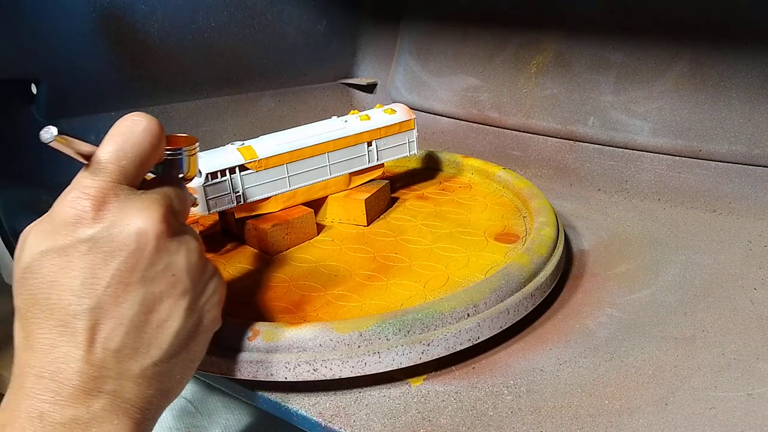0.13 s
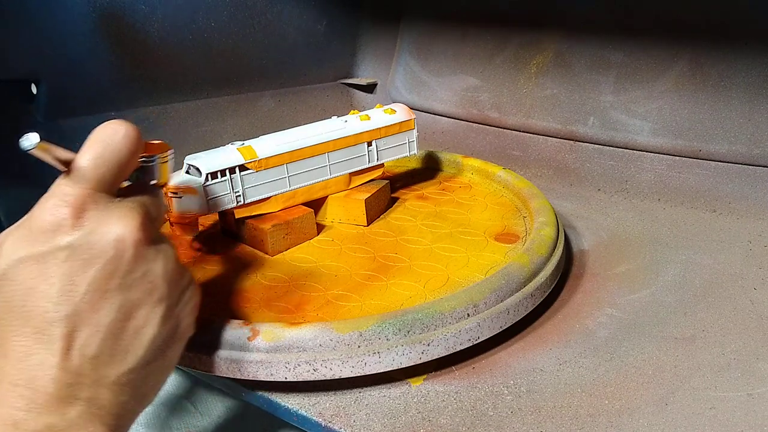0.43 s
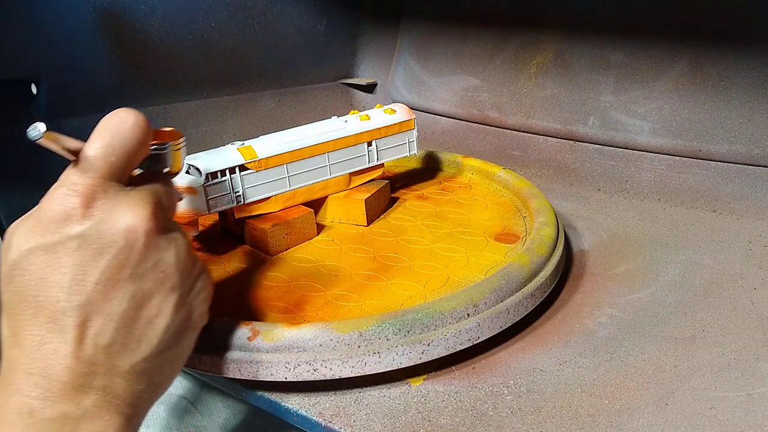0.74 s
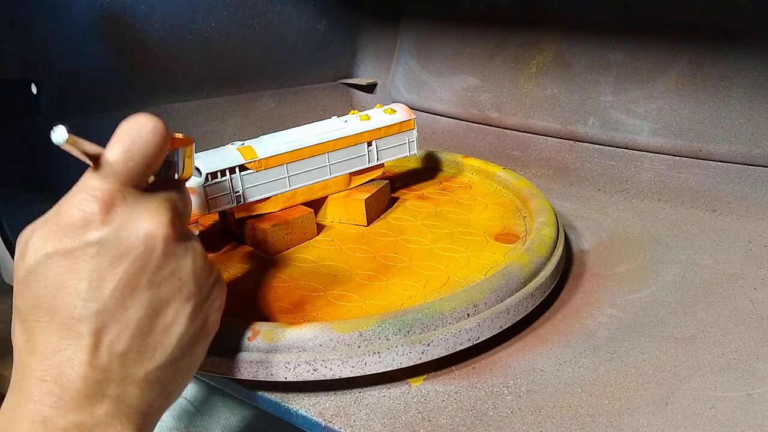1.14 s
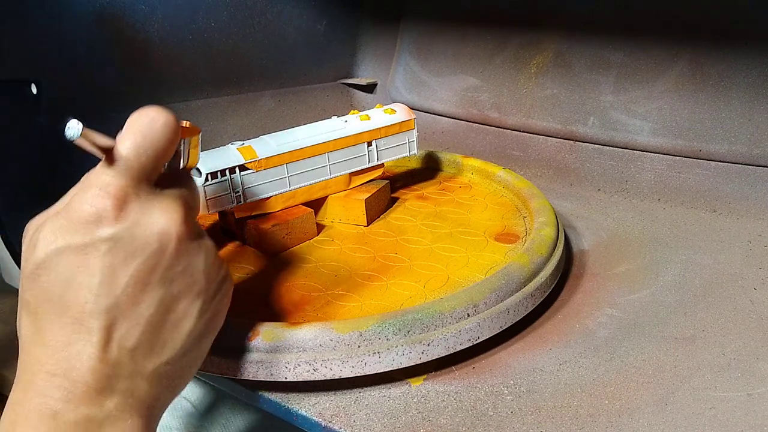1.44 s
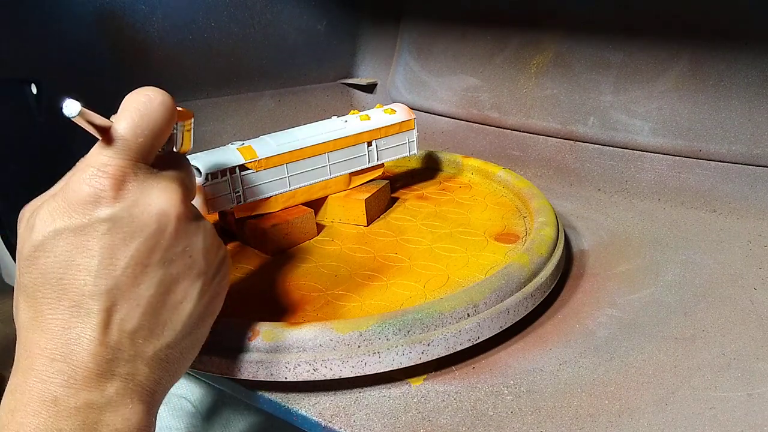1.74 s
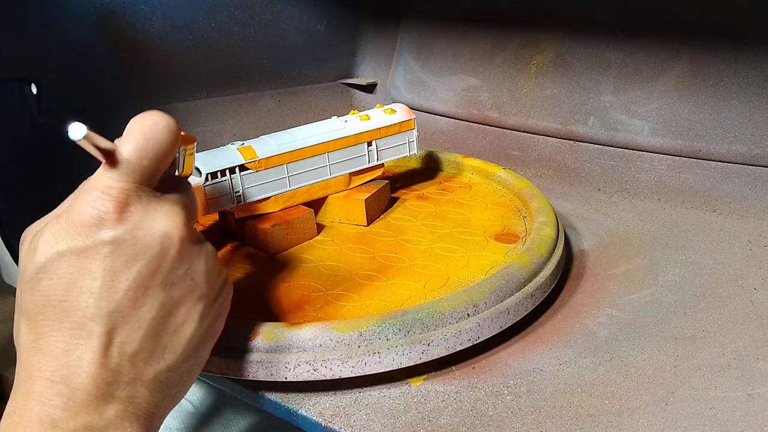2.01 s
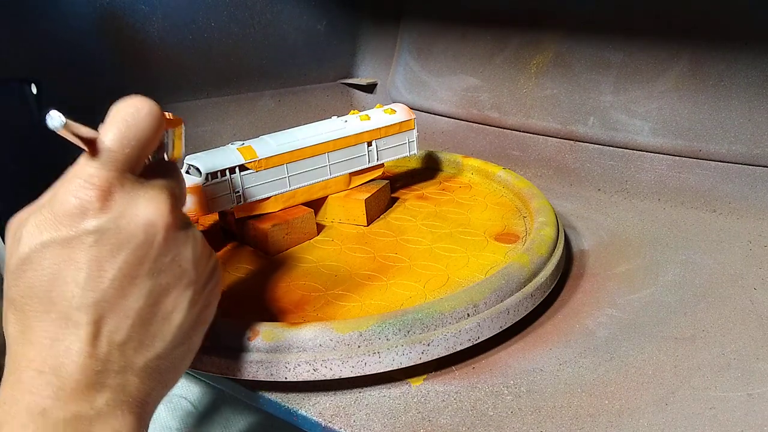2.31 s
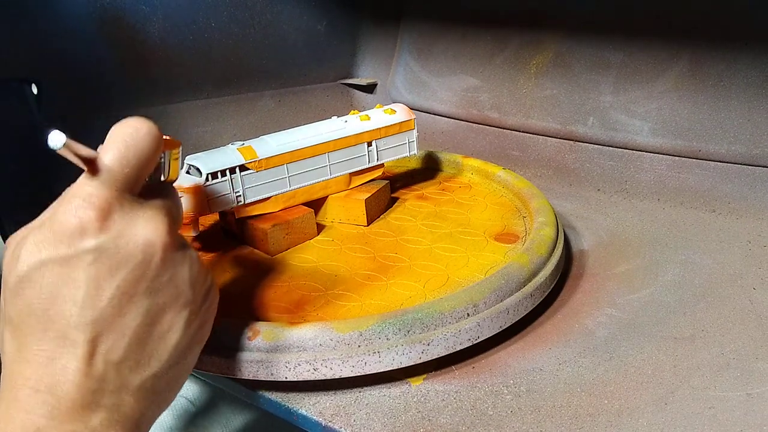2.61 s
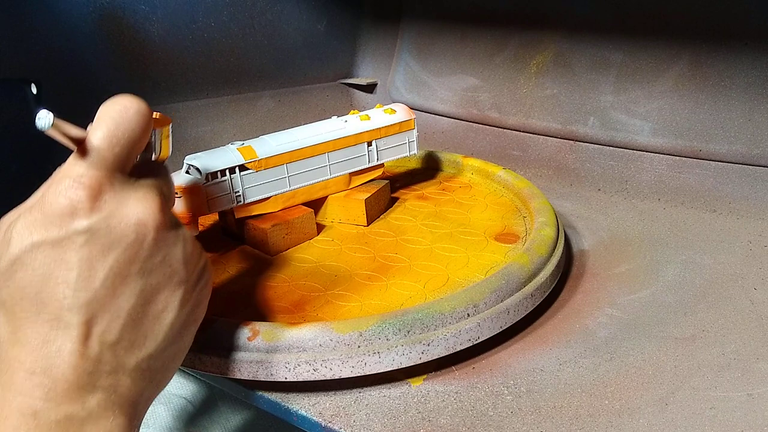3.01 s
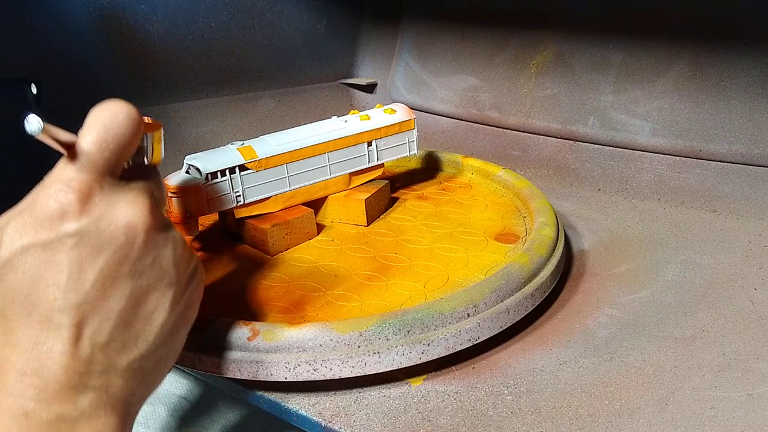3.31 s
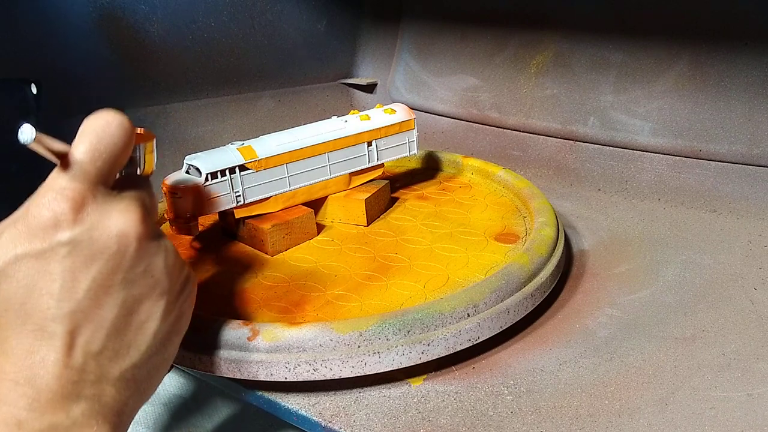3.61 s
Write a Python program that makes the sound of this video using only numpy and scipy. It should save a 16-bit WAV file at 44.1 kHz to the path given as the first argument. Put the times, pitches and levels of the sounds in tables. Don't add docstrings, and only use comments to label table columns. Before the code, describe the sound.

An airbrush hisses steadily at a small model, over a low motor hum and fan rumble.

```python
import sys
import numpy as np
from scipy import signal
from scipy.fft import rfft, irfft
from scipy.io import wavfile
from scipy.ndimage import uniform_filter1d

SR = 44100
rng = np.random.default_rng(int(sys.argv[2]) if len(sys.argv) > 2 else 0)


def convert_level_to_amplitude(level_db):
    exponent = np.asarray(level_db, float) / 20
    return 10 ** exponent


def transcribe(signal):
    frames = np.atleast_2d(signal).T
    limited = np.clip(frames, -1, 1)
    pcm = np.round(limited * 32767).astype(np.int16)
    wavfile.write(sys.argv[1], SR, pcm)


N = 165375

# left level in dB, right level in dB, right phase lead in rad.
MOTOR_LINES = [(-34, -44.5, 1.62), (-44.5, -48, 1.34), (-55.5, -51.5, 0.46), (-62, -60, 0.32)]
# frequency in Hz, density in dB per Hz.
FAN_SPECTRUM = [(30, -33), (95, -10), (140, 1.5), (260, -4.5), (550, -6), (1100, -9.5), (2000, -17),
                (5000, -31)]
# frequency in Hz, width in Hz, level in dB.
BOOTH_RESONANCES = [(151, 30, -24), (214, 51, 7.5), (275, 44, 1.5), (335, 27, -1.5), (390, 18.3, 5.5),
                    (718, 16, 8.5), (866, 5.4, -6.5), (910, 44, 7.5), (964.4, 28, 9), (1047, 22, 4),
                    (1156, 110, 6.5), (1280, 24, 9), (1510, 61, 4), (1627, 30, 9)]
# time in seconds, level in dB.
FAN_LOAD = [(0.0, -39), (0.31, -38.5), (0.63, -41), (0.75, -39.5), (1.23, -40.5), (1.29, -37.5),
            (1.52, -40.5), (2.36, -40), (2.49, -39.5), (2.74, -42.5), (2.88, -39), (2.92, -42.5),
            (3.09, -41), (3.75, -41)]
# mode frequency in Hz, level in dB, 60 dB decay time in seconds.
TAP_MODES = [(975, -6, 0.087), (1110, -12, 0.089)]
# start in seconds, length in seconds, ring level in dB,
# sizzle level in dB, rim whistle level in dB.
HOLLOW_SWELLS = [(0.094, 0.056, -49, -70, -81), (0.44, 0.027, -55, -57, -85), (0.518, 0.093, -66, -50, -85),
                 (0.609, 0.15, -49, -53, -63.5), (0.888, 0.09, -52.5, -59, -65.5),
                 (1.215, .04, -62, -68, -68), (1.27, 0.049, -49, -62, -80), (1.56, .04, -56, -61, -67),
                 (1.672, .03, -57, -62, -72), (1.767, 0.026, -43.5, -54, -72),
                 (2.151, 0.049, -46.5, -70, -66.5), (3.086, 0.096, -52.5, -63, -84),
                 (3.117, 0.03, -62, -69, -67), (3.448, 0.215, -42, -54, -62),
                 (3.47, 0.055, -49, -58.5, -70)]
# frequency in Hz, width in Hz, level in dB.
HOLLOW_RESONANCES = [(1720, 940, -3), (2680, 300, -1.5), (3746, 380, -2.5)]
# frequency in Hz, density in dB per Hz.
SPLASH_SPECTRUM = [(900, -4.5), (1600, 2.5), (2500, -2.5), (3300, -6.5), (4200, -13), (5500, -20),
                   (8000, -21), (13000, -34)]
# time in seconds, level in dB.
SWEEP = [(0.0, -48), (0.03, -54), (0.1, -46.5), (0.39, -56.5), (0.51, -42.5), (0.52, -50), (1.18, -54.5),
         (1.27, -46.5), (1.63, -52.5), (2.16, -50), (2.98, -59), (3.13, -50.5), (3.37, -61.5), (3.5, -47.5),
         (3.58, -60), (3.64, -48.5), (3.73, -61), (3.75, -47.5)]
# frequency in Hz, density in dB per Hz.
JET_SPECTRUM = [(1500, 3.5), (4000, -4.5), (6000, -5.5), (7800, -13), (9600, -5), (10500, -4), (13000, -7),
                (16000, -4.5)]
# frequency in Hz, width in Hz, level in dB.
JET_BANDS = [(11260, 780, 0), (13240, 600, 2), (15250, 500, 2)]
# time in seconds, level in dB.
JET_FLOW = [(0.0, -54), (1.2, -54.5), (1.29, -52.5), (1.48, -55), (2.05, -56), (2.11, -53.5), (2.66, -55),
            (2.74, -57), (2.87, -55), (2.9, -57), (3.24, -53.5), (3.33, -57.5), (3.63, -55), (3.69, -57.5),
            (3.75, -56)]
# frequency in Hz, swing in dB.
PATCH_DEPTH = [(200, 0.6), (1500, 1), (5000, 2.3), (9000, 2), (15000, 2.1)]
# frequency in Hz, right minus left in dB.
PORT_LEVEL = [(120, -6.5), (250, -14.5), (420, -4.5), (1600, -0.5), (3000, -3), (5000, -3), (7500, -9.5),
              (15000, -10.5)]
# frequency in Hz, phase in rad.
PORT_PHASE = [(120, 2.17), (350, 1.05), (1000, 2.74), (1400, 2.97), (1750, 2.16), (2900, 2.25),
              (3500, 2.62), (4400, 1.44)]
# frequency in Hz, likeness from 0 to 1.
PORT_LIKENESS = [(60, .3), (130, 0.95), (300, 0.91), (2200, 0.99), (4600, 0.95), (5200, 0.6), (7500, 0.75),
                 (11000, 0.78)]
# frequency in Hz, width in Hz, share lost from 0 to 1.
LIKENESS_DIPS = [(504, 84, 0.65), (1738, 374, 0.19), (2880, 436, 0.27), (3880, 97, 0.064)]
# frequency in Hz, sum over difference in dB.
SUM_FLOOR = [(1900, -12), (2200, -8.5), (2600, -14), (4000, -12), (4500, -5), (5100, -7)]
# frequency in Hz, step in dB.
ROUNDING_STEP = [(1700, -9), (2300, -3.5), (3100, -1.5), (4400, 2), (5500, 0.5), (7500, 1.5), (10500, -1.5),
                 (15000, -1.5)]


def curve(table):
    table = np.array(table)
    return np.interp(np.arange(N) / SR, table[:, 0], table[:, 1])


def across(table, hz):
    table = np.array(table)
    return np.interp(np.log(hz + 1), np.log(table[:, 0]), table[:, 1])


def rings(table, hz):
    return sum(convert_level_to_amplitude(2 * db) / (1 + (2 * (hz - f) / width) ** 2) for f, width, db in table)


def walk(rate):
    hold = int(SR / rate)
    steps = np.repeat(rng.standard_normal(N // 100), hold)[:N]
    return uniform_filter1d(uniform_filter1d(steps, hold), hold) * 4 / 3


def air(gain, flicker_db, rate, near=1):
    lag_s = 0.0003955
    hz = np.fft.rfftfreq(N, 1 / SR)
    left, other = rfft(rng.standard_normal((2, N)), axis=1)
    alike = near * across(PORT_LIKENESS, hz)
    for f, width, lost in LIKENESS_DIPS:
        alike = alike * (1 - lost * np.exp(-((hz - f) / width) ** 2))
    alike = np.clip(alike, 0, 1)
    turn = np.exp(1j * (across(PORT_PHASE, hz) - 2 * np.pi * hz * lag_s))
    right = convert_level_to_amplitude(across(PORT_LEVEL, hz)) * (alike * turn * left + np.sqrt(1 - alike ** 2) * other)
    both = np.array([left, right]) * gain(hz)
    place = 1.5 * np.log2((hz + 1) / 100).clip(0, 7)
    out = 0
    for band in range(12):
        share = np.clip(1 - abs(place - band), 0, 1)
        out = out + irfft(both * share, N, axis=1) * convert_level_to_amplitude(flicker_db * walk(rate))
    return out / np.sqrt(np.mean(out[0] ** 2))


def motor():
    twice_mains_hz, wobble_db = 119.97, 0.35
    t = np.arange(N) / SR
    hum = 0
    for multiple, (left_db, right_db, lead) in enumerate(MOTOR_LINES, 1):
        level = np.sqrt(2) * convert_level_to_amplitude(np.array([[left_db], [right_db]]) + wobble_db * walk(22.0))
        phase = np.array([[0], [lead]]) + rng.uniform(0, 2 * np.pi)
        hum = hum + level * np.sin(2 * np.pi * multiple * twice_mains_hz * t + phase)
    return hum


def fan(load_db):
    def gain(hz):
        return convert_level_to_amplitude(across(FAN_SPECTRUM, hz) - 4) * np.sqrt(1 + rings(BOOTH_RESONANCES, hz))
    return air(gain, flicker_db=1.45, rate=8.77) * convert_level_to_amplitude(-33.5 + load_db)


def tap():
    start_s, level_db = 3.077, -27
    t = np.clip(np.arange(N) / SR - start_s, 0, None)
    return sum(convert_level_to_amplitude(level_db + db - 60 * t / t60) * np.sin(2 * np.pi * hz * t) for hz, db, t60 in TAP_MODES)


def hollow():
    attack_s, release_s, likeness = 0.0085, 0.004, 0.61
    t = np.arange(N) / SR
    ring, sizzle, rim = 0, 0, 0
    for start, length, ring_db, sizzle_db, rim_db in HOLLOW_SWELLS:
        rise = np.clip((t - start) / attack_s, 0, 1)
        env = rise * np.exp(-np.clip(t - start - length, 0, None) / release_s)
        ring = ring + convert_level_to_amplitude(ring_db) * env
        sizzle = sizzle + convert_level_to_amplitude(sizzle_db) * env
        rim = rim + convert_level_to_amplitude(rim_db) * env

    def cavity(hz):
        return rings(HOLLOW_RESONANCES, hz) ** 0.8

    def bright(hz):
        return rings([(5560, 7400, 0)], hz) / (1 + (4900 / (hz + 1)) ** 10)

    swell = air(cavity, 0.99, 25.35, likeness) * ring + air(bright, 1.4, 24.5, likeness) * sizzle
    edge_tone = rings([(4410, 350, 0)], np.fft.rfftfreq(N, 1 / SR))
    whistle = irfft(rfft(rng.standard_normal(N)) * edge_tone, N)
    return swell + whistle / whistle.std() * rim


def splash(sweep_db):
    def gain(hz):
        return convert_level_to_amplitude(across(SPLASH_SPECTRUM, hz)) * hz ** 2 / (hz ** 2 + 700 ** 2)
    return air(gain, flicker_db=-1.4, rate=14) * convert_level_to_amplitude(8 + sweep_db)


def jet():
    echo_t60_s, echo_db = 0.05, -9
    t = np.arange(4096) / SR
    tail = rng.standard_normal(4096) * convert_level_to_amplitude(-60 * t / echo_t60_s)
    echo = 1 + convert_level_to_amplitude(echo_db) * rfft(tail / np.sqrt(np.sum(tail ** 2)), N)

    def gain(hz):
        nozzle = convert_level_to_amplitude(across(JET_SPECTRUM, hz) - 2) * np.sqrt(1 + rings(JET_BANDS, hz))
        return nozzle * echo * (hz / (hz + 1000)) ** 2
    return air(gain, flicker_db=-0.1, rate=29.6) * convert_level_to_amplitude(9.5 + curve(JET_FLOW))


def blur(v, hz, s):
    across_hz = uniform_filter1d(v, max(int(hz * 1024 / SR), 1), axis=-2)
    return uniform_filter1d(across_hz, max(int(s * SR / 256), 1), axis=-1)


def hand(x):
    patch_hz, patch_s, own_share = 128, 0.12, 0.73
    hz, _, z = signal.stft(x, SR, nperseg=1024, noverlap=768)
    field = rng.standard_normal((3,) + z.shape[1:])
    field = blur(blur(field, patch_hz, patch_s), patch_hz / 2, patch_s / 2)
    field = (field[0] + own_share * field[1:]) / field.std()
    patches = convert_level_to_amplitude(across(PATCH_DEPTH, hz)[:, None] * field)
    return signal.istft(z * patches, SR, nperseg=1024, noverlap=768)[1][:, :N]


def scene():
    load_db = curve(FAN_LOAD)
    load_db = load_db - load_db.mean()
    noises = fan(load_db) + hollow() + splash(curve(SWEEP)) + jet()
    return motor() * convert_level_to_amplitude(0.79 * load_db) + hand(noises) + tap()


def round_blocks(x):
    round_from_hz, ports_from_hz, top_hz = 1700, 5170, 15500
    pad = 829 + 1024
    n, k = np.arange(2048)[:, None] + 0.5, np.arange(1024) + 0.5
    basis = np.sin(np.pi * n / 2048) * np.cos(np.pi / 1024 * (n + 512) * k) / np.sqrt(512)
    hz = k * SR / 2048

    def turn(v):
        pair = np.array([v[0] + v[1], v[0] - v[1]]) / np.sqrt(2)
        return np.where(hz < ports_from_hz, pair, v)

    halves = np.pad(x, ((0, 0), (pad, 2048 - (N + pad) % 1024))).reshape(2, -1, 1024)
    z = turn(np.concatenate([halves[:, :-1], halves[:, 1:]], axis=2) @ basis)
    power = (z ** 2).reshape(2, -1, 128, 8).mean(axis=3)
    total, diff = uniform_filter1d(power, size=2, axis=1).repeat(8, axis=2)
    strong = total > diff * convert_level_to_amplitude(2 * across(SUM_FLOOR, hz))
    z[0] = z[0] * (strong | (hz < round_from_hz) | (hz > ports_from_hz))
    power = (z ** 2).reshape(2, -1, 32, 32).mean(axis=3)
    band = uniform_filter1d(power, size=3, axis=1).max(axis=0)
    step = np.sqrt(np.repeat(band, 32, axis=1) + 1e-18) * convert_level_to_amplitude(across(ROUNDING_STEP, hz))
    rounded = np.sign(z) * step * np.floor((abs(z) / step) ** 0.75 + 0.4054) ** (4 / 3)
    blocks = turn(np.where(hz > round_from_hz, rounded, z) * (hz < top_hz)) @ basis.T
    lapped = (blocks[:, :-1, 1024:] + blocks[:, 1:, :1024]).reshape(2, -1)
    return lapped[:, pad - 1024:][:, :N]


def roll_off(x):
    return signal.sosfilt(signal.butter(12, 15520, fs=SR, output="sos"), x)


def record(dry):
    mix = round_blocks(dry)
    return roll_off(mix)


dry = scene()
out = record(dry)
transcribe(out)
```